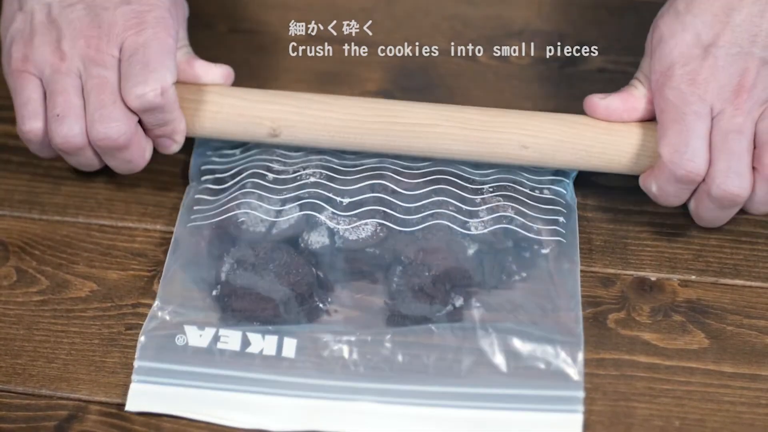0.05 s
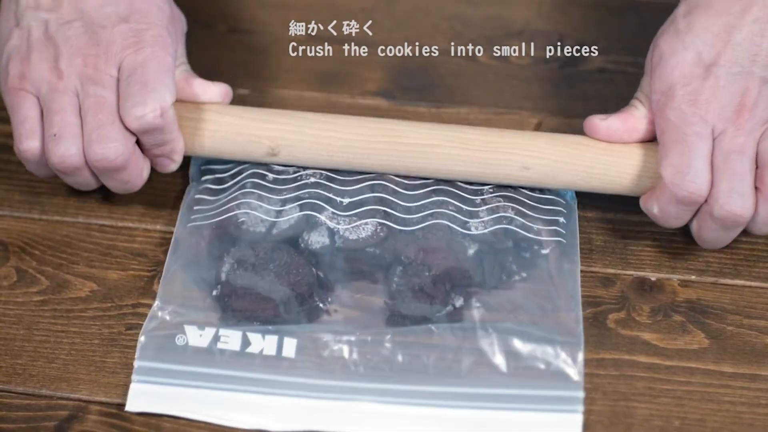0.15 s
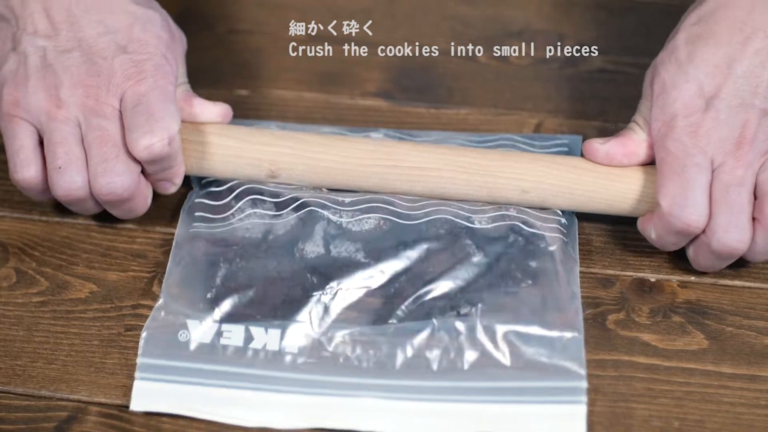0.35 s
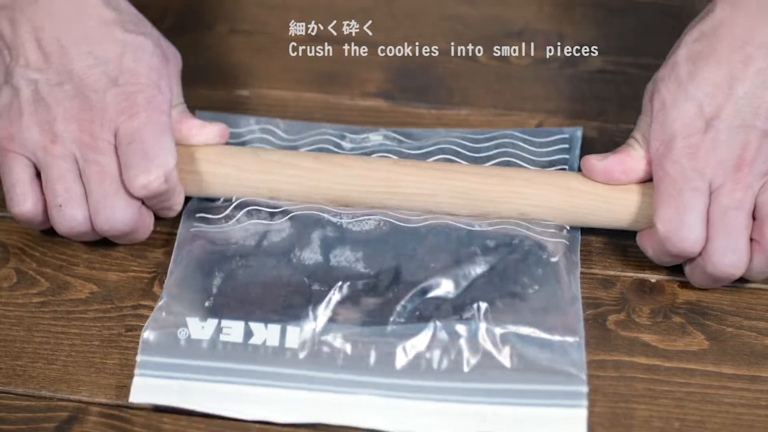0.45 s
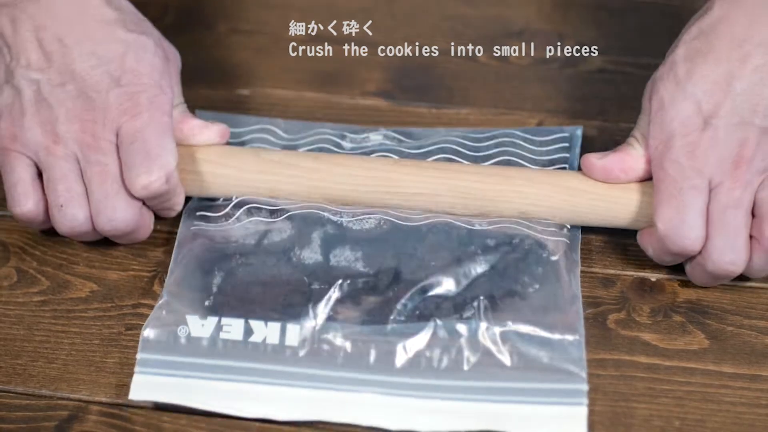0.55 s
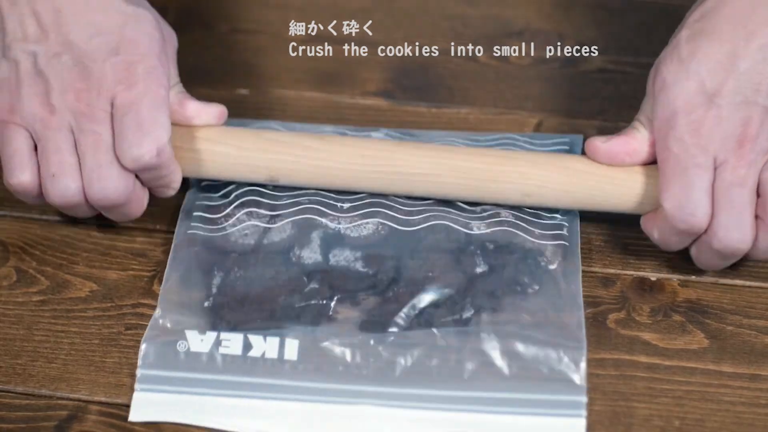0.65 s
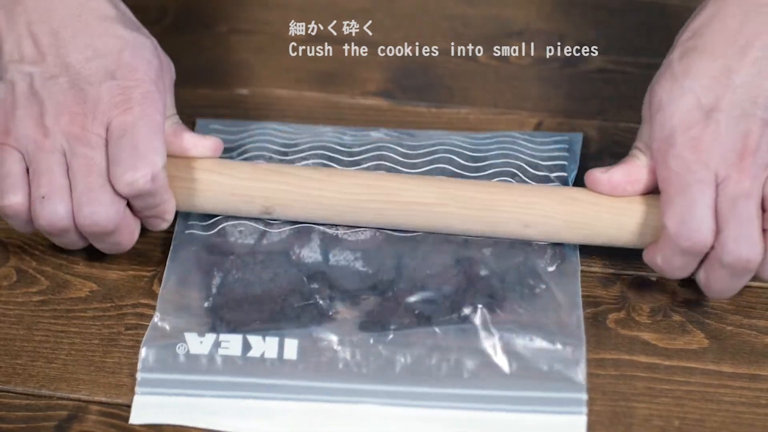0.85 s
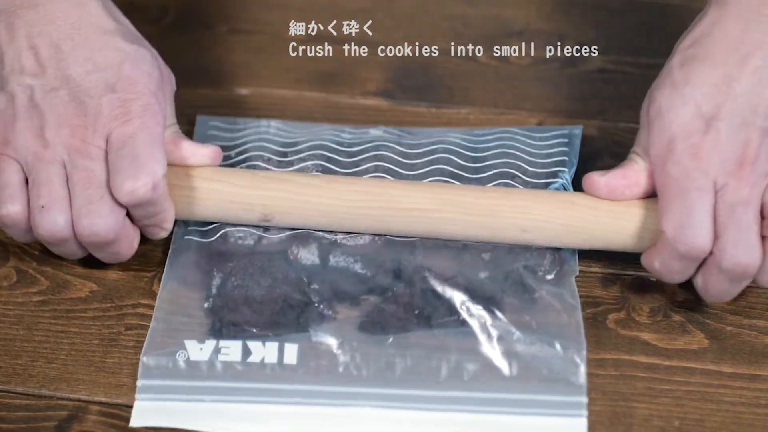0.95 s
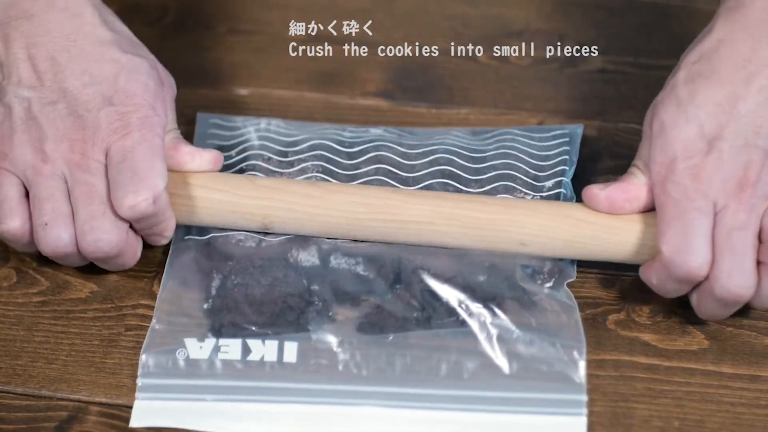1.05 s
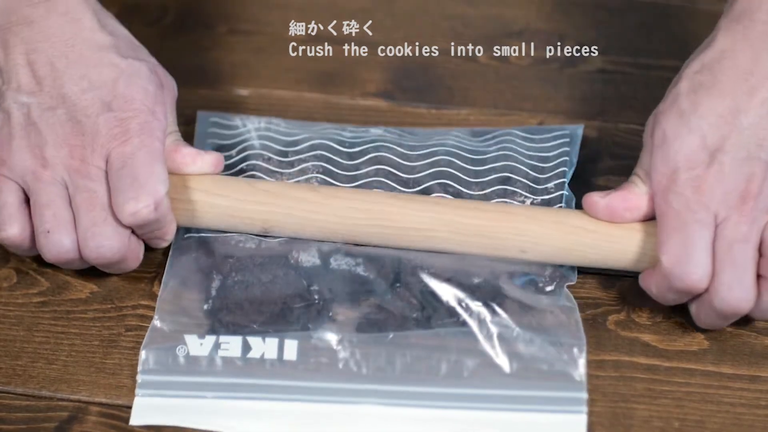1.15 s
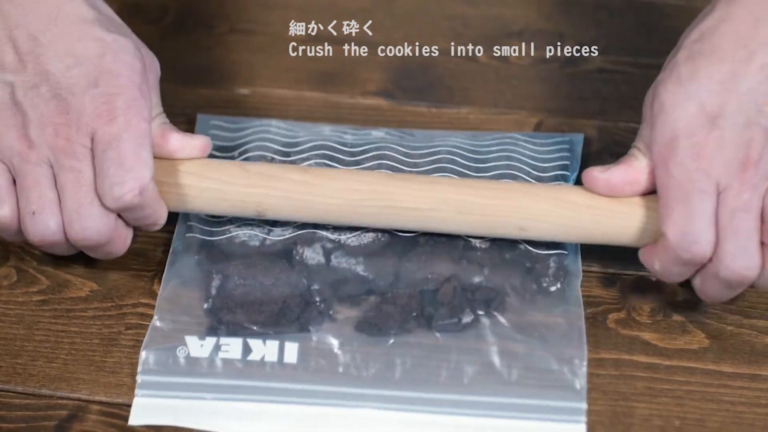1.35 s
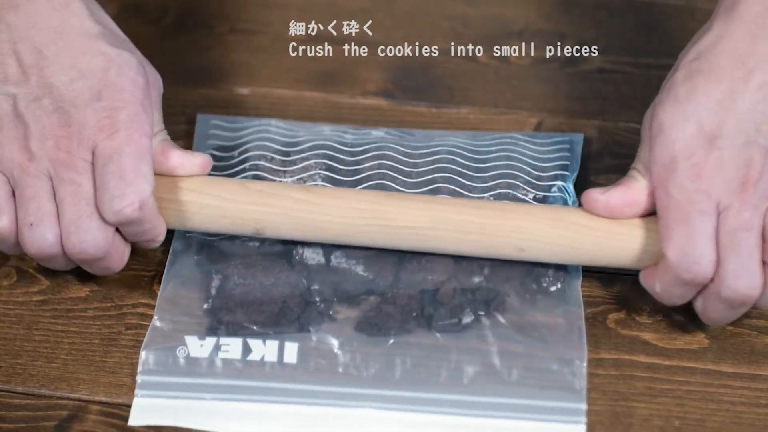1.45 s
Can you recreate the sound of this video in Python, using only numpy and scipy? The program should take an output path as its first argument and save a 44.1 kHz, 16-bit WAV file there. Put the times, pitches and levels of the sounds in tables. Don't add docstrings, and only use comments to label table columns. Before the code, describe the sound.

Crunching of hard cookies crushed in a crinkling plastic bag by a wooden rolling pin, two pushes

```python
import sys
import numpy as np
from scipy import signal
from scipy.fft import rfft, irfft
from scipy.io import wavfile

SR = 44100
rng = np.random.default_rng(int(sys.argv[2]) if len(sys.argv) > 2 else 0)


def to_linear_factor(level_db):
    exponent = np.asarray(level_db, float) / 20
    return 10 ** exponent


def transcribe(signal):
    frames = np.atleast_2d(signal).T
    limited = np.clip(frames, -1, 1)
    pcm = np.round(limited * 32767).astype(np.int16)
    wavfile.write(sys.argv[1], SR, pcm)


N = 63945

# t/s, crunch level/dB
PUSH_LOADS = [
    [(0.18, -69), (0.226, -32), (0.306, -42.5), (0.342, -27), (0.44, -32.5), (0.448, -24), (0.494, -24.5),
     (0.626, -78), (0.64, -73)],
    [(0.86, -79), (0.914, -35.5), (0.98, -40.5), (1.02, -24), (1.046, -31.5), (1.06, -25.5), (1.07, -29),
     (1.178, -37), (1.31, -58.5)],
]
# f/Hz, level/dB
CRUMB_SPECTRUM = [(300, -28), (450, -11), (800, -5.5), (1050, 0.5), (1670, 1), (3000, -2), (6000, -15)]
# f/Hz, level/dB
FILM_SPECTRUM = [(2500, -4), (4500, -7.5), (7000, -5), (9500, -9.5), (11500, -2.5), (12600, -14),
                 (13800, -39), (16500, -2)]
CREASES_PER_S, CREASE_SPREAD_DB = 30000, 2.0


def rms_one(x):
    return x / np.sqrt(np.mean(x ** 2) + 1e-20)


def in_time(rows):
    return np.interp(np.arange(N) / SR, *np.transpose(rows))


def at_hz(points, hz):
    point_hz, point_db = np.transpose(points)
    return np.interp(np.log(hz), np.log(point_hz), point_db)


def highpass(x, order, hz):
    return signal.sosfilt(signal.butter(order, hz, "high", fs=SR, output="sos"), x)


def click_at(s):
    return np.arange(N) == int(s * SR)


def ring(clicks, hz, t60):
    radius = to_linear_factor(-60 / (t60 * SR))
    w = 2 * np.pi * hz / SR
    return signal.lfilter([0, np.sin(w)], [1, -2 * radius * np.cos(w), radius * radius], clicks + 1e-18)


def grains(per_s, spread_db):
    sizes = to_linear_factor(spread_db * np.minimum(rng.exponential(1, N), 5))
    signs = rng.choice([-1, 1], N)
    return rms_one(sizes * signs * (rng.random(N) < per_s / SR))


def dealt(clicks, spectrum, cycles, count):
    low, high = spectrum[0][0], min(spectrum[-1][0], 0.4 * SR)
    hand = rng.integers(0, count, N)
    unit = np.arange(2000) == 0
    out, power = 0, 0
    for k, hz in enumerate(np.geomspace(low, high, count)):
        gain = to_linear_factor(at_hz(spectrum, hz)) * np.sqrt(hz)
        size = np.linalg.norm(ring(unit, hz, cycles / hz))
        out = out + gain * ring(clicks * (hand == k), hz, cycles / hz) / size
        power += gain ** 2 / count
    return out / np.sqrt(power)


def wood(clicks):
    # f/Hz, level/dB, t60/s
    modes = [(240, -14.5, 0.05), (385, -8, 0.11), (500, -5.5, 0.23), (676, -15, 0.15), (790, 1.5, 0.041),
             (1240, -8, 0.18), (1295, -1, 0.092), (1574, -2, 0.15), (1700, 0.5, 0.13), (2121, 0, 0.027),
             (2400, -14, 0.23), (2620, -4, 0.09)]
    out = 0
    for hz, db, t60 in modes:
        knocks = clicks * rng.standard_normal(N)
        out = out + to_linear_factor(db) * ring(knocks, hz, t60) / np.sqrt(t60 * SR / 28)
    return to_linear_factor(-14.5) * out


def push_loads(release_s):
    loads = []
    for push in PUSH_LOADS:
        start, end = (push[0][0] - 0.01, -90), (push[-1][0] + release_s, -90)
        loads.append(to_linear_factor(in_time([start] + list(push) + [end])))
    return loads


def air():
    # f/Hz, level/dB
    tone = [(25, -9.5), (60, -12.5), (160, -13.5), (310, -5.5), (1050, -6), (1600, -14.5), (3500, -29),
            (16000, -45)]
    hz = np.maximum(np.arange(N // 2 + 1) * SR / N, 1)
    noise = irfft(rfft(rng.standard_normal(N)) * to_linear_factor(at_hz(tone, hz)), N)
    return to_linear_factor(-55) * rms_one(noise)


def crinkle():
    # t/s, crinkle level/dB
    movement = [(0, -50), (.045, -57), (.062, -68), (.188, -70.5), (.218, -41.5), (.31, -42), (.338, -29.5),
                (.425, -35), (.49, -27), (.535, -38), (.6, -75), (.645, -69), (.682, -53), (.688, -48.5),
                (.745, -60), (.79, -67.5), (.868, -73.5), (.9, -42.5), (1.19, -35.5), (1.285, -55),
                (1.352, -50), (1.41, -65)]
    clicks = to_linear_factor(in_time(movement)) * grains(CREASES_PER_S, CREASE_SPREAD_DB)
    crumbs = to_linear_factor(-1.5) * dealt(clicks, CRUMB_SPECTRUM, cycles=12.8, count=12)
    return dealt(clicks, FILM_SPECTRUM, cycles=30.4, count=40) + crumbs


def snaps():
    # t/s, peak level/dB,
    # f/Hz, length/cycles, sharp edge level/dB
    snap_rows = [(.0028, -30.5, 2730, 2.8, -22), (.0041, -31, 2320, 3.7, -14), (0.193, -41, 1900, 3.7, -1),
                 (.3373, -13.5, 1900, 2.2, -7), (.3388, -13.5, 3070, 5, -8), (0.3401, -16, 2400, 2.5, 0),
                 (.3465, -25, 840, 4.5, -28), (.3535, -27, 705, 2.5, -27), (0.6862, -27.5, 4530, 8, -14),
                 (.6864, -40, 8000, 9, -7), (0.6872, -35.5, 1800, 7, -20), (.6912, -40, 3940, 6.1, -13),
                 (.714, -46, 10700, 18, -15), (0.7195, -33.5, 1500, 2.7, -15), (.7275, -36, 1750, 7.1, -15),
                 (.729, -35.5, 2090, 7, -15), (.764, -38.5, 2500, 6.3, -18), (.7815, -39.5, 3020, 3.9, -10),
                 (1.020, -22, 880, 13, -17), (1.058, -19.5, 860, 6.7, -10), (1.1285, -17.5, 1490, 2, 6.5),
                 (1.3265, -32.5, 3720, 4.4, -4), (1.3272, -43, 1500, 3, -20), (1.3298, -31.5, 3300, 3.1, -11),
                 (1.3535, -31, 2600, 8, -4), (1.3537, -35, 3300, 6.3, -16), (1.3545, -41, 7500, 10, -2)]
    # t/s, peak level/dB, f/Hz
    fragments = [(0.2058, -36, 1760), (0.213, -40, 2490), (0.2169, -32, 1720), (0.2243, -26, 2170),
                 (0.234, -31, 1880), (0.2437, -23.5, 1640), (0.2581, -33, 1800), (0.274, -32, 1120),
                 (0.2894, -34, 1160), (0.2915, -31, 1290), (0.32, -22.5, 2280), (0.3343, -20, 2000),
                 (0.3364, -17, 1950), (0.3531, -16.5, 1840), (0.3715, -9.5, 2040), (0.3747, -12.5, 2020),
                 (0.3782, -24, 2060), (0.4046, -14.5, 3070), (0.4101, -19, 1600), (0.423, -18, 1490),
                 (0.4468, -21, 1420), (0.4502, -21, 1950), (0.4557, -15, 1930), (0.4649, -13, 1630),
                 (0.4703, -15, 1590), (0.4956, -12.5, 2050), (0.5039, -14, 2560), (0.523, -18, 1850),
                 (0.5353, -20, 1620), (0.5435, -39, 1120), (0.5617, -29, 1650), (0.5832, -39, 1420),
                 (0.881, -47, 1550), (0.8842, -49, 2710), (0.9095, -36, 1610), (0.9146, -31, 1670),
                 (0.9239, -30, 1100), (0.9305, -22, 2050), (0.9432, -30, 1200), (0.949, -33, 1370),
                 (0.9636, -40, 1850), (0.9683, -37, 1610), (0.981, -27, 1890), (0.9988, -16.5, 2900),
                 (1.0111, -22.5, 1490), (1.0161, -26, 1760), (1.0203, -30, 1720), (1.0248, -26, 1720),
                 (1.0597, -30, 1920), (1.072, -21.5, 2060), (1.1296, -20.5, 3670), (1.1486, -25.5, 1700),
                 (1.1889, -23, 1670), (1.208, -38, 1850), (1.2285, -34, 1590), (1.2311, -28, 1640),
                 (1.2391, -31, 2300), (1.2477, -29, 1630)]
    fragment_cycles, fragment_edge_db, fragment_knock_db = 4.1, -12, 12
    overtone_ratio, overtone_db = 1.63, -3.5
    edge_t60_s = 0.0009

    out, edges, knocks = np.zeros(N), np.zeros(N), np.zeros(N)
    pieces = [(*row, fragment_cycles, fragment_edge_db) for row in fragments]
    for s, db, hz, cycles, edge_db in list(snap_rows) + pieces:
        click = -to_linear_factor(db - 4) * click_at(s)
        t60 = cycles / hz
        out += ring(ring(click, hz, t60), hz, t60) * 40 / (t60 * SR)
        edges += to_linear_factor(edge_db) * click
    for s, db, hz in fragments:
        late_click = np.arange(N) == int(s * SR) + 6
        out += ring(to_linear_factor(db + overtone_db) * late_click, min(overtone_ratio * hz, 5000), 0.002)
        knocks[int(s * SR)] = to_linear_factor(db + fragment_knock_db)
    sharp = sum(ring(edges, hz, edge_t60_s) for hz in (6500, 11500))
    return out + sharp + wood(knocks)


def crushing():
    fractures_per_s, fracture_spread_db = 6000, 3
    pin_hz, pin_db, pin_t60_s = (757, 828), (-11, -11), 0.04
    loads = push_loads(release_s=0.056)
    clicks = sum(loads) * grains(fractures_per_s, fracture_spread_db)
    grip = sum(to_linear_factor(db) * load for db, load in zip(pin_db, loads))
    pin = sum(ring(grip * rng.standard_normal(N), hz, pin_t60_s) for hz in pin_hz)
    pin = pin / np.sqrt(pin_t60_s * SR / 14)
    crumbs = dealt(clicks, CRUMB_SPECTRUM, cycles=9.9, count=16)
    return to_linear_factor(-4.0) * (crumbs + wood(clicks)) + pin


def cracks():
    load = sum(push_loads(release_s=0.044))
    clicks = grains(per_s=1500, spread_db=2.0)
    pulse = ring(clicks, 2370, 0.00055) + to_linear_factor(15) * ring(clicks, 5850, 0.00039)
    return to_linear_factor(-14) * load * rms_one(pulse)


def collapses():
    # t/s, level/dB, dying time/s, f/Hz, knock on the wood/dB
    cookies = [(0.206, -41, 0.013, 1830, 0), (0.226, -31.5, 0.02, 1440, -2), (0.288, -36, 0.014, 2500, 7),
               (0.339, -21, 0.0088, 1250, -2), (.371, -27, 0.0046, 2020, 9),
               (0.404, -25.5, 0.02, 1800, 4.5), (0.445, -43, 0.095, 2020, -30),
               (0.448, -26.5, 0.048, 2950, -7), (0.463, -30, 0.0064, 1700, 2),
               (0.492, -34.5, 0.021, 1940, -26), (.88, -53, 0.018, 2480, -4), (.895, -41, 0.017, 2000, 5),
               (0.906, -37, 0.037, 840, 5.5), (0.95, -37, 0.04, 750, -1), (1.001, -30.5, 0.025, 915, 2),
               (1.017, -32.5, 0.018, 930, 7.5), (1.056, -31.5, 0.032, 965, -6),
               (1.118, -29.5, 0.033, 1490, -13), (1.166, -45, 0.0091, 940, 1),
               (1.186, -46, 0.012, 1600, 11)]
    attack_s = 0.0013
    t = np.arange(N) / SR
    shower = grains(per_s=9000, spread_db=2.8)
    own, film_load, knocks = 0, 0, 0
    for s, db, dying, hz, knock_db in cookies:
        age = np.maximum(t - s, 0)
        shape = to_linear_factor(db) * (1 - np.exp(-age / attack_s)) * np.exp(-age / dying)
        clicks = shape * shower
        own = own + ring(clicks, hz, 2.1 / hz) * np.sqrt(hz / SR * 6)
        film_load = film_load + shape
        knocks = knocks + to_linear_factor(knock_db) * clicks
    creases = film_load * grains(CREASES_PER_S, CREASE_SPREAD_DB)
    film = to_linear_factor(-4) * dealt(creases, FILM_SPECTRUM, cycles=28.0, count=24)
    return own + wood(knocks) + film


def thuds():
    # t/s, peak level/dB, f/Hz
    thud_rows = [(0.226, -50, 120), (.27, -54, 85), (.29, -47, 130), (.41, -49, 60), (.935, -58, 60),
                 (1.208, -57, 110), (.24, -42.5, 195), (.255, -39.5, 500), (0.33, -39.5, 94.5),
                 (0.332, -30.5, 500), (.335, -39, 191), (0.344, -28, 385), (.37, -52, 186), (0.396, -51, 90),
                 (0.45, -38.5, 98), (0.459, -50, 208), (.462, -52, 38), (0.501, -56, 108), (0.906, -40.5, 187),
                 (0.921, -50, 92.6), (0.984, -40.5, 119.5), (1.006, -36.5, 387.5), (1.019, -42.5, 95),
                 (1.054, -66, 103), (1.15, -51.5, 94.4), (1.188, -48, 190), (.222, -37.5, 772),
                 (.26, -37.5, 790), (.34, -30, 790), (.915, -42, 750), (.953, -32, 783.5), (.978, -33, 777),
                 (1.012, -36, 810), (1.052, -47, 790), (1.16, -31.5, 808)]
    t60_s, shortens = 0.19, 0.36
    t = np.arange(N) / SR
    out = 0
    for s, db, hz in thud_rows:
        age = np.maximum(t - s, 0) * 2 * np.log(1000) / t60_s * (hz / 200) ** shortens
        swell = age * np.exp(1 - age)
        out = out + to_linear_factor(db) * swell * np.sin(2 * np.pi * hz * (t - s))
    return out


def kitchen(x):
    t60_s, wall_cut_hz = 0.21, 2860
    out = np.zeros(N)
    dull = np.exp(-2 * np.pi * wall_cut_hz / SR)
    lags = (rng.uniform(0.008, 0.03, 8) * SR).astype(int)
    for k, lag in enumerate(lags):
        loop, state = x.copy(), [0.]
        gain = to_linear_factor(-60 * lag / SR / t60_s)
        for i in range(lag, N, lag):
            back, state = signal.lfilter([gain * (1 - dull)], [1, -dull], loop[i - lag:i], zi=state)
            loop[i:i + lag] += back[:N - i]
        out += (loop - x) * (-1) ** k
    return out


def scene():
    table = crinkle() + snaps() + crushing() + cracks() + collapses()
    table = highpass(table, 4, 165)
    mid = table + thuds() + to_linear_factor(-16.5) * kitchen(table) + air()
    late = np.concatenate([np.zeros(150), mid[:-150]])
    bright = late + highpass(late, 1, 5400)
    hiss = highpass(rng.standard_normal(N), 2, 1800)
    side = to_linear_factor(-39) * bright + to_linear_factor(-74) * hiss
    return mid + side * np.array([[1], [-1]])


def top_cut(x):
    return signal.sosfilt(signal.butter(12, 16670, fs=SR, output="sos"), x)


def record(dry):
    hz = np.arange(N // 2 + 1) * SR / N
    cut = irfft(rfft(dry) * (hz < 15790), N)
    return top_cut(cut)


dry = scene()
out = record(dry)
transcribe(out)
```